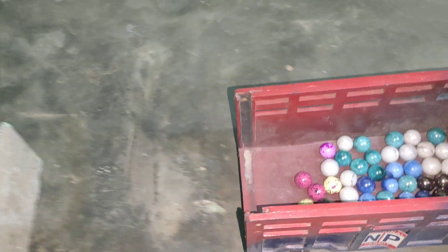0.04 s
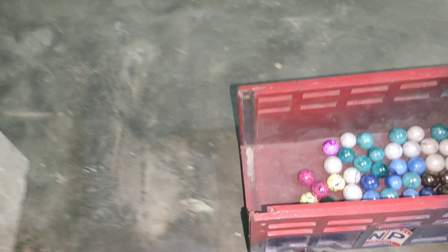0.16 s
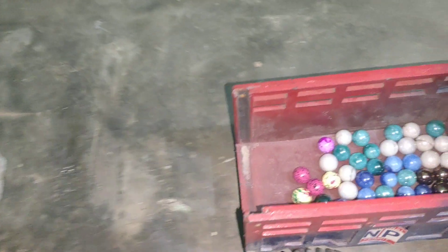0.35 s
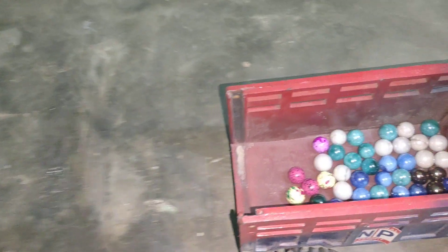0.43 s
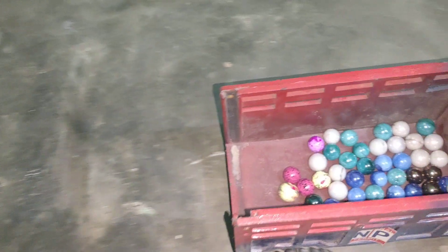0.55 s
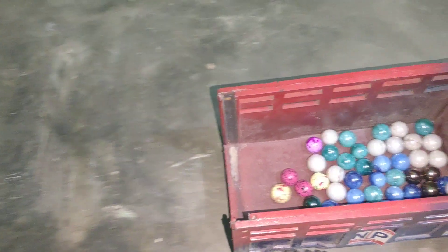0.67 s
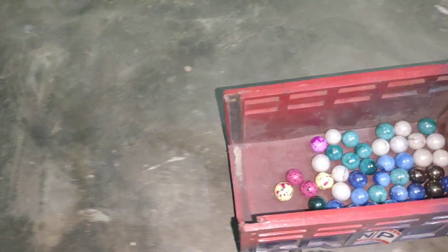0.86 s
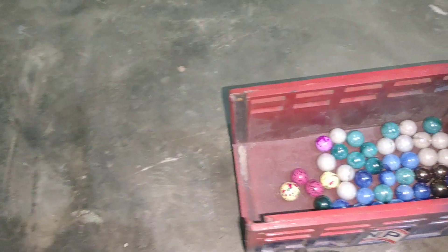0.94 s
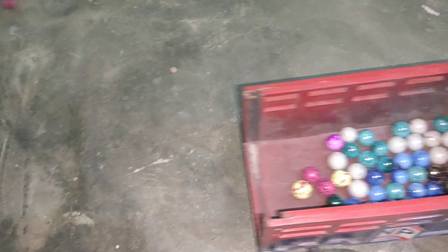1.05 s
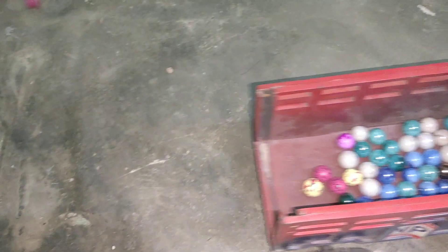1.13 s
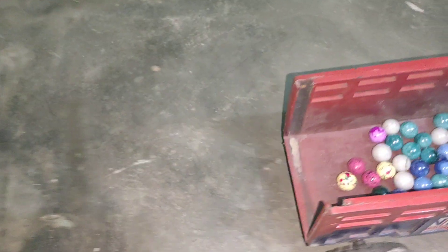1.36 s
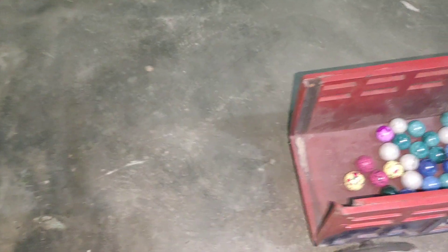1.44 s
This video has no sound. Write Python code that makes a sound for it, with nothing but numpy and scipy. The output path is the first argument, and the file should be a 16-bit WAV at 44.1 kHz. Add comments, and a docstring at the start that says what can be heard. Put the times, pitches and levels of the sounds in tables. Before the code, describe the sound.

Hard clacks of a marble bouncing on a concrete floor, then a faint, gritty roll.

```python
"""Marble on a concrete floor

Outdoors under a roof, close to a stereo microphone and a little to its right, a marble bounces hard
beside a plastic crate of marbles, in ever shorter hops. It then rolls away over the rough floor,
thumping on bumps and ticking on grit. Nearby walls and the roof throw each clack back.
An earlier knock dies away at the start, and a low outdoor background lies underneath."""
import sys
import numpy as np
from scipy import signal
from scipy.fft import rfft, irfft
from scipy.io import wavfile
from scipy.ndimage import uniform_filter1d

SR = 44100
rng = np.random.default_rng(int(sys.argv[2]) if len(sys.argv) > 2 else 0)


def transcribe(u):
    """Save the signal u as a 16-bit wav file named by the first command-line argument.

    u: samples, shape (n,) or (channels, n), limited to [-1, 1]; the rate is SR.
    q: integer samples, one column per channel.
    """
    v = np.clip(np.atleast_2d(u).T, -1, 1)
    q = np.round(v * 32767).astype(np.int16)
    wavfile.write(sys.argv[1], SR, q)


N = 66150

# Outdoor background spectrum: freq_hz, level_db
AIR_SPECTRUM = [(15, -36), (40, -17), (70, -7), (150, -1), (380, 3), (600, -3), (1000, -7), (2000, -17),
                (4000, -25), (9000, -31), (12000, -39), (16000, -50)]
# Spectrum of an earlier knock, still ringing under the roof: freq_hz, level_db
LINGER_SPECTRUM = [(30, -39), (100, -17), (400, -6.5), (1300, 9), (2500, -1.5), (5000, -5), (10000, -14.5),
                   (15000, -36)]
# Low rumble, an earlier knock fading at first, then the marble rolling from about 0.8 s: time_s, level_db
RUMBLE_LEVEL = [(0, 2.5), (.08, -5.5), (.14, -16), (.4, -12), (0.719, -18), (.8, 1), (.9, -0.5), (1.05, -1),
                (1.2, -2), (1.3, 0), (1.412, 0), (1.5, -2)]
# Spectrum of the low rumble: freq_hz, level_db
RUMBLE_SPECTRUM = [(20, -45.5), (60, -31.5), (110, -16), (170, -4), (230, -4), (330, 2.5), (480, 0),
                   (700, 2), (1100, -5.5), (2300, -11), (4000, -24.5), (7000, -34), (14000, -47.5)]
# Uneven spots in the floor: start_s, level_db
THUMPS = [(0.074, -11.5), (0.167, -12.5), (0.300, 0), (0.794, -1), (0.818, -3), (0.851, -7), (0.872, -2),
          (1.225, 1.5), (1.240, -5), (1.286, 4), (1.298, -7), (1.387, -2.5), (1.401, 3), (1.451, -1)]
# Soft hollow taps: start_s, level_db, pitch_hz
TAPS = [(0.184, -46.5, 950), (0.6096, -35, 1320)]
# Landings: start_s, level_db, tone_db at each of the five TONE_HZ, clatter_decay_s, reverb_db,
# ring_lift_db, ring_centre_hz, wall_echo_db
BOUNCES = [(0.2340, -1.5, 3.5, -3.5, 0.5, 1.5, -3, 0.0021, 1, 9.8, 4570, -11),
           (0.4522, -1.5, -4, 1, -5, 1.5, 0, 0.00098, -2.5, 3.5, 7000, 3.5),
           (0.6494, -6, -5.5, 0.5, 3, -1, 0.5, 0.0024, -5, 4.4, 2300, 4),
           (0.7411, -16, 0, 5.5, 4, -2.5, -1, 0.0022, -15, 2, 1890, 2)]
TONE_HZ = (250, 900, 2400, 4600, 8000)
# Modes rung by each landing: pitch_hz, level_db, t60_s
CLACK_MODES = [(279.4, -28, .11), (705, -21, 0.029), (1022, -36.5, 0.25), (2107, -26, 0.1),
               (2610, -21, 0.025), (3013, -21, 0.027), (4290, -19.5, 0.009), (4790, -15.5, 0.013),
               (7080, -22, 0.02), (9030, -17, 0.021)]
# Spectrum of a clack close to the microphone: freq_hz, level_db
CLACK_SPECTRUM = [(20, -35), (50, -44), (100, -23), (190, -16), (280, -2.5), (600, -3), (1400, -3),
                  (2500, 3.5), (5000, -4), (7000, -5.5), (9500, -5), (12000, -21), (16000, -51)]
# The clack's reverberation, with the top treble cut away above 12 kHz as by a codec: freq_hz, level_db
REVERB_SPECTRUM = [(20, -34), (60, -35), (110, -16.5), (165, -3.5), (210, -8), (275, -3), (450, -4.5),
                   (750, -1), (1400, -2.5), (2300, 4), (4500, -1), (7000, -4), (9500, -8.5), (12000, -16),
                   (13500, -38), (16000, -51)]
# Contacts with grit and between marbles: start_s, level_db, tilt_db_per_octave
TICKS = [(0.5075, 8.5, 4), (0.7700, 0, 1.5), (0.7875, 0, 0), (0.8130, -6, -1.5), (0.9005, 2.5, -1.5),
         (0.9285, 3.5, 1), (0.9500, -5, -3), (0.9640, 1, -0.5), (0.9845, 3, 2), (1.0060, -13, -4),
         (1.0250, -7, -4), (1.0460, -12, -5), (1.0625, -3.5, 2.5), (1.0880, -9, -4), (1.0975, -8, 0.5),
         (1.1160, 3, 1), (1.1412, 1, 0), (1.1620, -3.5, -1), (1.1940, -9, -0.5), (1.2285, -8, -2.5),
         (1.2445, -6.5, -3), (1.2655, -19.5, -9.5), (1.2780, -18, -2), (1.2870, -9.5, -5), (1.3060, -6, 2),
         (1.3520, -8.5, -5), (1.4015, -12, -9.5), (1.4322, -7.5, -1.5), (1.4520, -11, -5)]
# Spectrum of a tick: freq_hz, level_db
TICK_SPECTRUM = [(20, -39), (60, -32.5), (250, -4.5), (700, 3), (1400, 4), (2300, 3), (3000, -3),
                 (4500, -3.5), (5400, -15), (7000, -24), (9000, -31.5), (15000, -48)]
# Early reflections, then that of the nearest wall: delay_s, level_db, centre_hz, width_octaves, smear_s
EARLY_ECHOES = [(.0019, -5, 2780, 1.1, 0.00018), (0.0167, -6.5, 8000, 0.56, .0016),
                (0.0327, -10, 6000, 1.2, 0.0029)]
WALL_ECHO = (.0078, 2, 1950, .42, .0006)
# Reverberation time under the roof: freq_hz, t60_s
ROOM_T60 = [(170, 0.4), (280, 0.27), (530, 0.41), (1400, .36), (3700, 0.34), (9700, 0.33), (15000, 0.2)]
# Shading of direct sound on the microphone's left side: freq_hz, gain_db
LEFT_SHADE = [(100, -4.5), (1000, -4), (2500, -6.5), (4500, -6.5), (6800, -0.5), (8500, -21.5),
              (15000, -12)]
# Likeness of diffuse sound in the two channels: freq_hz, correlation (0-1)
COHERENCE = [(60, 0.34), (250, 0.72), (500, 0.67), (1000, 0), (16000, 0.18)]

AIR_DB, LINGER_DB, LINGER_AGE_S = -59.5, 4, .1
RUMBLE_DB, BUMPS_PER_S, BUMP_SPREAD_DB, RUMBLE_ROOM_DB = -49.5, 550, 3, -4.5
THUMP_DB, THUMP_DECAY_S, THUMP_ROOM_DB = -4.5, .0025, -6.5
TAP_RISE_S, TAP_ROOM_DB = 0.0011, -7.5
CLACK_DB, CLICK_DB, CLATTER_DB, RING_OCTAVES = 7.5, -3, 5, 0.38
TICK_DB, TICK_DECAY_S, TICK_ROOM_DB, TICK_ECHO_DB = -10, 0.0024, -5, -5.5
REVERB_DB, REVERB_BUILD_S = 10, 0.0038
LEFT_LAG_S, LEFT_ROOM_DB, CUTOFF_HZ = 0.00024, -1.5, 16400
SIZE, SHORT = 16384, 4096  # samples in one event; in a filter or burst
T, HZ = np.arange(SIZE) / SR, np.fft.rfftfreq(SIZE, 1 / SR)


def amp(db):
    """Decibels to gain."""
    return 10 ** (np.asarray(db) / 20)


def curve(points, hz=HZ):
    """Interpolates a table on a log-frequency axis."""
    freq_hz, value = np.transpose(points)
    return np.interp(np.log(hz + 1), np.log(freq_hz), value)


def add(mix, start_s, sound):
    """Mixes a stereo sound in at a time."""
    part = mix[:, round(start_s * SR):][:, :sound.shape[1]]
    part += sound[:, :part.shape[1]]


def colour(sound, gain_db):
    """Minimum-phase filter with the given gain at HZ."""
    cepstrum = irfft(np.log(amp(gain_db)))
    cepstrum[1:SIZE // 2] *= 2
    cepstrum[SIZE // 2 + 1:] = 0
    impulse = irfft(np.exp(rfft(cepstrum)))[:SHORT]
    return signal.fftconvolve(sound, impulse[None], axes=1)[:, :sound.shape[1]]


def diffuse_noise(count):
    """Noise from all around the microphone: the channels are most alike low down, the left weaker."""
    right, unrelated = rfft(rng.standard_normal((2, count)))
    alike = curve(COHERENCE, np.fft.rfftfreq(count, 1 / SR))
    left = alike * right + np.sqrt(1 - alike ** 2) * unrelated
    return irfft(np.array([amp(LEFT_ROOM_DB) * left, right]), count)


def burst(decay_s):
    """A brief scatter of noise with a nearly even spectrum."""
    t = T[:SHORT]
    spectrum = rfft(rng.standard_normal((2, SHORT)) * np.exp(-t / decay_s))
    spectrum /= np.sqrt(uniform_filter1d(abs(spectrum) ** 2, size=80, axis=1) + 1e-12)
    scatter = irfft(spectrum) * np.exp(-t / (20 * decay_s))
    return np.pad(scatter, ((0, 0), (0, SIZE - SHORT)))


def snap(decay_s):
    """A clean click followed by a little scatter."""
    return amp(-2) * (T == 0) + amp(-3.5) * burst(decay_s)


def reverb():
    """Diffuse sound builds up between walls and roof, then fades; the top treble dies first."""
    hz, t, bands = signal.stft(diffuse_noise(SIZE), SR, nperseg=256)
    decay = amp(-60 * t / curve(ROOM_T60, hz)[:, None])
    tail = signal.istft(bands * decay, SR, nperseg=256)[1][:, :SIZE]
    tail *= 1 - np.exp(-T / REVERB_BUILD_S)
    return tail / np.linalg.norm(tail[1])


def echo(delay_s, level_db, centre_hz, width_octaves, smear_s):
    """One surface sends the sound back late, smeared and limited to a band."""
    out = np.zeros((2, SIZE))
    loss_db = 10 * np.log10(1 + (np.log2((HZ + 1) / centre_hz) / width_octaves) ** 4)
    add(out, delay_s, colour(snap(smear_s), level_db - loss_db))
    return out * amp([[LEFT_ROOM_DB], [0]])


def echoes(wall_db=0):
    """Early reflections from the crate, the roof and the nearest wall."""
    return sum(echo(*row) for row in EARLY_ECHOES) + amp(wall_db) * echo(*WALL_ECHO)


def from_right(sound):
    """Direct sound from the right reaches the microphone's left side later and duller."""
    out = sound * [[0], [1]]
    add(out, LEFT_LAG_S, colour(sound, curve(LEFT_SHADE)) * [[1], [0]])
    return out


def background():
    """Low outdoor noise all around, and the last of an earlier knock's reverberation."""
    air = colour(diffuse_noise(N), curve(AIR_SPECTRUM))
    air = air / air.std() * amp(AIR_DB)
    linger = colour(reverb(), LINGER_DB + curve(LINGER_SPECTRUM))
    add(air, 0, linger[:, round(LINGER_AGE_S * SR):])
    return air


def rumble():
    """Dense little bumps: first an earlier knock fading, later the marble rolling on rough concrete."""
    heights = amp(BUMP_SPREAD_DB * np.minimum(rng.exponential(1, N), 3)) * rng.choice([-1, 1], N)
    bumps = heights * (rng.random(N) < BUMPS_PER_S / SR) * np.ones((2, 1))
    room = signal.fftconvolve(bumps, reverb() + echoes(), axes=1)[:, :N]
    dull = colour(from_right(bumps) + amp(RUMBLE_ROOM_DB) * room, curve(RUMBLE_SPECTRUM))
    level_db = np.interp(np.arange(N) / SR, *np.transpose(RUMBLE_LEVEL))
    return dull / dull.std() * amp(RUMBLE_DB + level_db)


def thumps():
    """Larger bumps where the floor is uneven, as dull as the rumble."""
    out = np.zeros((2, N))
    room = amp(THUMP_ROOM_DB) * reverb()
    for start_s, level_db in THUMPS:
        direct = from_right(burst(THUMP_DECAY_S)[[0, 0]])  # one burst feeds both channels
        add(out, start_s, amp(THUMP_DB + level_db) * (direct + room))
    return colour(out, curve(RUMBLE_SPECTRUM))


def taps():
    """Soft hollow knocks of a few cycles each, centred between the channels."""
    out = np.zeros((2, N))
    envelope = T / TAP_RISE_S * np.exp(1 - T / TAP_RISE_S)
    for start_s, level_db, pitch_hz in TAPS:
        knock = amp(level_db) * envelope * np.sin(2 * np.pi * pitch_hz * T)
        room = signal.fftconvolve(knock[None], reverb(), axes=1)[:, :SIZE]
        add(out, start_s, knock + amp(TAP_ROOM_DB) * room)
    return out


def ring(lift_db, centre_hz):
    """A landing excites short modes, favouring those near one pitch."""
    out = 0
    for pitch_hz, level_db, t60_s in CLACK_MODES:
        boost_db = lift_db * np.exp(-(np.log2(pitch_hz / centre_hz) / RING_OCTAVES) ** 2)
        out += amp(level_db + boost_db - 60 * T / t60_s) * np.sin(2 * np.pi * pitch_hz * T) / 2
    return out


def bounces():
    """Each landing clicks, clatters and rings close to the microphone; walls and roof answer."""
    out = np.zeros((2, N))
    for start_s, level_db, *bands_db, clatter_s, room_db, lift_db, ring_hz, wall_db in BOUNCES:
        tone_db = curve(list(zip(TONE_HZ, bands_db)))
        strike = amp(CLICK_DB) * (T == 0) + amp(CLATTER_DB) * burst(clatter_s) + ring(lift_db, ring_hz)
        near = from_right(strike) + echoes(wall_db)
        clack = colour(near, CLACK_DB + level_db + curve(CLACK_SPECTRUM) + tone_db)
        room = colour(reverb(), REVERB_DB + room_db + curve(REVERB_SPECTRUM) + 0.56 * tone_db)
        add(out, start_s, clack + room)
    return out


def ticks():
    """Small sharp contacts as the marble meets grit and marbles touch, under the same roof."""
    out = np.zeros((2, N))
    early = amp(TICK_ECHO_DB) * echoes()
    tails = [amp(TICK_ROOM_DB) * reverb() for _ in range(4)]
    octaves = np.log2(np.clip(HZ, 300, 8000) / 2000)  # brightness tilts about 2 kHz
    for k, (start_s, level_db, tilt) in enumerate(TICKS):
        tick = from_right(snap(TICK_DECAY_S)) + early + tails[k % len(tails)]
        add(out, start_s, colour(tick, TICK_DB + level_db + curve(TICK_SPECTRUM) + tilt * octaves))
    return out


def scene():
    """The marble and the outdoor background as they reach the microphone."""
    return bounces() + ticks() + taps() + rumble() + thumps() + background()


def record(dry):
    """The recorder cuts off the highest treble."""
    lowpass = signal.firwin(511, CUTOFF_HZ, window=("kaiser", 9), fs=SR)
    return signal.oaconvolve(dry, lowpass[None], "same")


dry = scene()
out = record(dry)
transcribe(out)
```